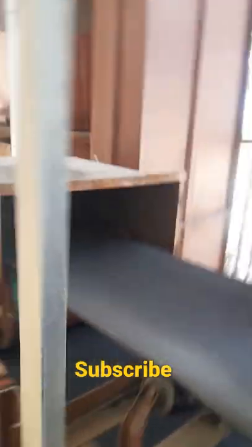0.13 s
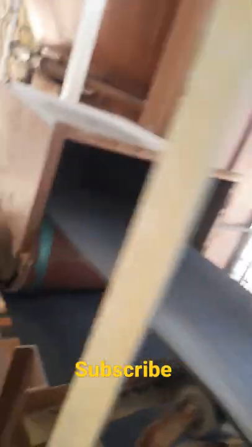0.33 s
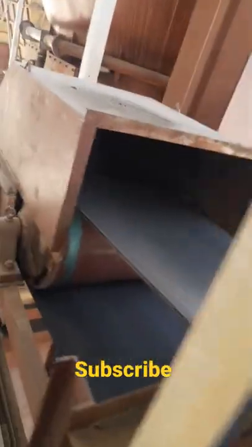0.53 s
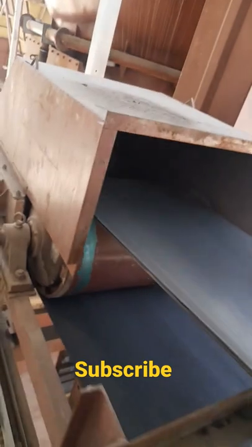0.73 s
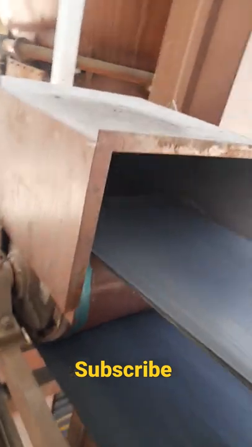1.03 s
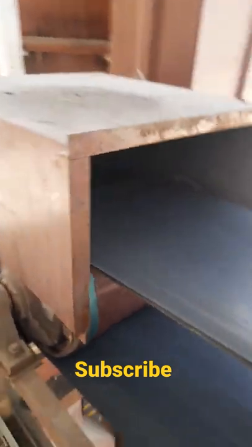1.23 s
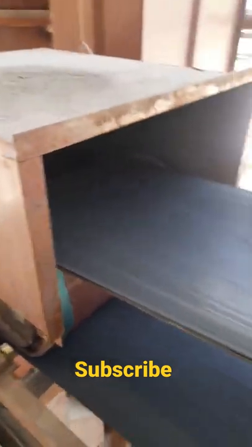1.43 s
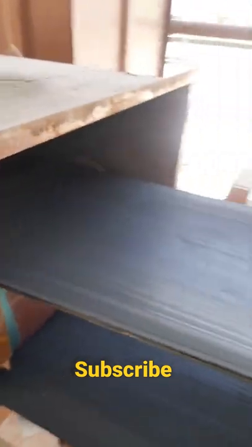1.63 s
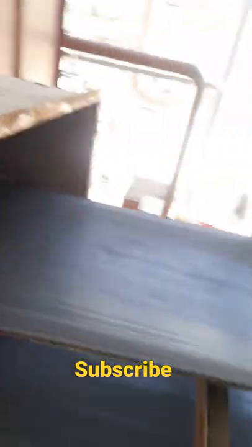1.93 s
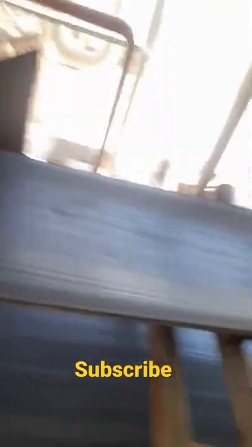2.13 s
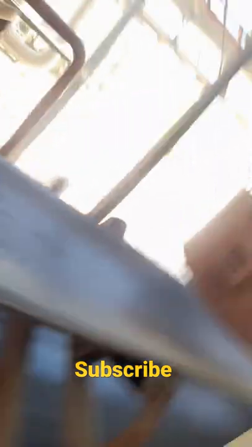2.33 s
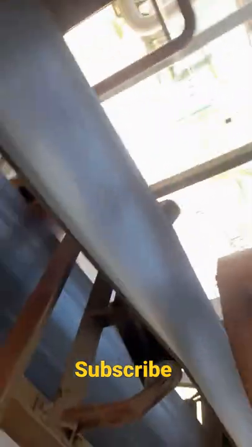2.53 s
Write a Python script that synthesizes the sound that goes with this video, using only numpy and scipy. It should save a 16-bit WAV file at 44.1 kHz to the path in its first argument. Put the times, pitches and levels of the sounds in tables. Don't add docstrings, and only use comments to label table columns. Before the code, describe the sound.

Steady conveyor machinery drone, a wavering tonal hum with rumbling belt and soft roller hiss

```python
import sys
import numpy as np
from scipy import signal
from scipy.fft import rfft, irfft
from scipy.io import wavfile
from scipy.ndimage import uniform_filter1d

SR = 44100
rng = np.random.default_rng(int(sys.argv[2]) if len(sys.argv) > 2 else 0)


def magnitude_from_level(level_db):
    exponent = np.asarray(level_db, float) / 20
    return 10 ** exponent


def int16_out(signal):
    q = np.round(np.clip(np.atleast_2d(signal).T, -1, 1) * 32767)
    wavfile.write(sys.argv[1], SR, q.astype(np.int16))


N = 118629


def curve(table, column):
    table = np.array(table)
    return np.interp(np.arange(N) / SR, table[:, 0], table[:, column])


def wander(rate_hz):
    hold = int(SR / rate_hz)
    steps = np.repeat(rng.standard_normal(N // hold + 2), hold)
    smooth = uniform_filter1d(uniform_filter1d(steps, hold), hold)[:N]
    return (smooth - smooth.mean()) / smooth.std()


def tone(hz, db):
    cycles = np.cumsum(hz * np.ones(N)) / SR + rng.random()
    return np.sqrt(2) * magnitude_from_level(db) * np.sin(2 * np.pi * cycles)


def noise(spectrum, db, flicker_db, flicker_hz, swell_db):
    spectrum = np.array(spectrum)
    hz = np.maximum(np.arange(N // 2 + 1) * SR / N, 1.)
    colour_db = np.interp(np.log(hz), np.log(spectrum[:, 0]), spectrum[:, 1], -90, -90)
    full = rfft(rng.standard_normal(N)) * magnitude_from_level(colour_db)
    place = 3 * np.log2(hz / 20)
    swell = swell_db * wander(1.5)
    out = 0
    for band in range(30):
        share = np.clip(1 - abs(place - band), 0, 1) * full
        if np.abs(share).max() > 1:
            out = out + irfft(share, N) * magnitude_from_level(swell + flicker_db * wander(flicker_hz))
    return out * magnitude_from_level(db) / np.std(out)


# time in seconds,
# then the levels in dB of partials 1, 2, 3, 4 and 5.
MESH_PARTIALS = [(0, -15, -48.5, -47, -46, -53), (.15, -16, -46.5, -50, -40, -61.5),
                 (.3, -20, -35, -44.5, -44, -57), (.45, -23, -36, -47, -45.5, -50),
                 (.6, -20.5, -41, -46, -41.5, -47), (.8, -17.5, -39.5, -52, -46.5, -59),
                 (.95, -15.5, -60, -51.5, -43.5, -47), (1.1, -15.5, -46, -48, -45, -50),
                 (1.3, -17.5, -43, -41.5, -45, -51), (1.5, -18, -51.5, -42, -43.5, -57.5),
                 (1.7, -18, -42, -46.5, -47.5, -49.5), (1.9, -21, -52.5, -48, -43, -44),
                 (2.05, -21, -49, -57.5, -50.5, -57), (2.2, -23.5, -36.5, -42.5, -46, -51),
                 (2.45, -25.5, -34.5, -35.5, -50, -51), (2.69, -26.5, -33.5, -41, -52, -57)]
# multiple of the mesh pitch, level in dB.
UPPER_PARTIALS = [
    (6, -53.5),
    (7, -52.5),
    (8, -58.5),
    (9, -63.5),
    (10, -65.5),
]


def gearbox():
    mesh_hz = 364.33 + .15 * wander(2.1)
    out = 0
    for k in range(1, 6):
        level_db = curve(MESH_PARTIALS, k) + .5 * (k - 1) * wander(12)
        out = out + tone(k * mesh_hz, level_db)
    for k, db in UPPER_PARTIALS:
        out = out + tone(k * mesh_hz, db + 3.1 * wander(6.96))
    return out


# time in seconds, level in dB.
HUM_LEVEL = [(0, -33), (.15, -38), (.28, -33.5), (.48, -42), (.58, -33), (.8, -33.5), (.95, -35.5),
             (1.1, -28.5), (1.25, -32), (1.37, -25), (1.52, -43.5), (1.7, -31.5), (1.8, -32.5), (1.95, -26),
             (2.22, -39), (2.35, -34), (2.47, -29.5), (2.69, -33.5)]
# pitch in Hz, level in dB, fading in dB.
LONE_TONES = [
    (202, -47, 3),
    (795, -52, 4),
    (1325, -54, 3),
    (700, -55, 4),
]


def motors():
    out = tone(101.2 + .72 * wander(5), curve(HUM_LEVEL, 1) + .87 * wander(15))
    for hz, db, fade_db in LONE_TONES:
        out = out + tone(hz + .8 * wander(4), db + fade_db * wander(7))
    return out


# time in seconds, pitch in Hz, length in seconds, level in dB.
BEARING_SQUEAKS = [
    (2.657, 6080, .014, -47),
    (2.51, 6200, .008, -52),
]


def squeaks():
    t = np.arange(N) / SR
    out = 0
    for at, hz, length, db in BEARING_SQUEAKS:
        out = out + tone(hz, db) * np.exp(-((t - at) / length) ** 2)
    return out


# time in seconds, level in dB.
IDLER_NEARNESS = [
    (0, -1),
    (.5, -.3),
    (1.2, 0),
    (2.0, 0),
    (2.35, .3),
    (2.69, 1.3),
]


def nearness_db():
    near = curve(IDLER_NEARNESS, 1)
    return near - np.mean(near)


# frequency in Hz, density in dB per Hz.
ROAR_SPECTRUM = [(25, -30.5), (48, -11.5), (72, -5.5), (160, -11.5), (240, -10.5), (325, 0.5), (400, -5),
                 (600, -20.5), (900, -49)]


def belt_roar():
    roar = noise(ROAR_SPECTRUM, -28, flicker_db=.7, flicker_hz=5, swell_db=.4)
    return roar * magnitude_from_level(.4 * nearness_db())


# frequency in Hz, density in dB per Hz.
HISS_SPECTRUM = [(400, -25.5), (650, -4.5), (1500, -6.5), (2800, -8.5), (4000, -16.5), (6200, -16),
                 (7000, -26), (8000, -45.5)]
# frequency in Hz, density in dB per Hz.
AIR_SPECTRUM = [(6500, -21.5), (8000, -2.5), (10000, -2), (13000, 1), (15000, -3.5), (16000, -7)]


def idlers():
    hiss = noise(HISS_SPECTRUM, -35.5, flicker_db=.5, flicker_hz=6, swell_db=.1)
    air = noise(AIR_SPECTRUM, -62, flicker_db=.5, flicker_hz=8, swell_db=.1)
    return magnitude_from_level(nearness_db()) * (hiss + air)


def scene():
    heard = 2 * (gearbox() + motors() + squeaks() + belt_roar() + idlers())
    return np.array([0 * heard, heard])


def low_pass(x):
    return signal.sosfilt(signal.butter(12, 15480, fs=SR, output="sos"), x)


def record(dry):
    leak_db, corner_hz = -59, 900
    leak = magnitude_from_level(leak_db) * signal.lfilter(*signal.butter(1, corner_hz, fs=SR), dry[1])
    mix = np.array([leak, dry[1]])
    return low_pass(mix)


dry = scene()
out = record(dry)
int16_out(out)
```